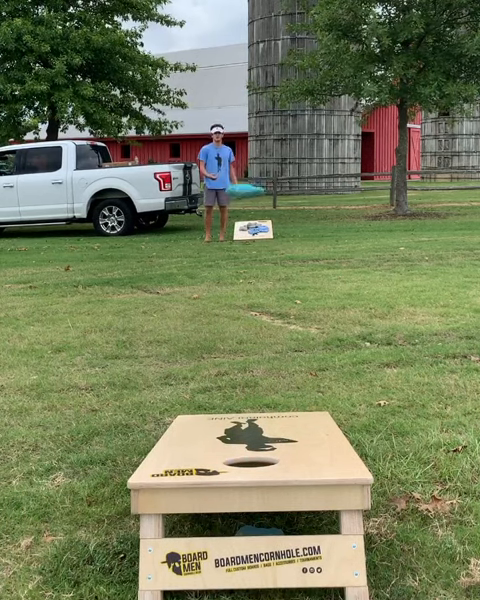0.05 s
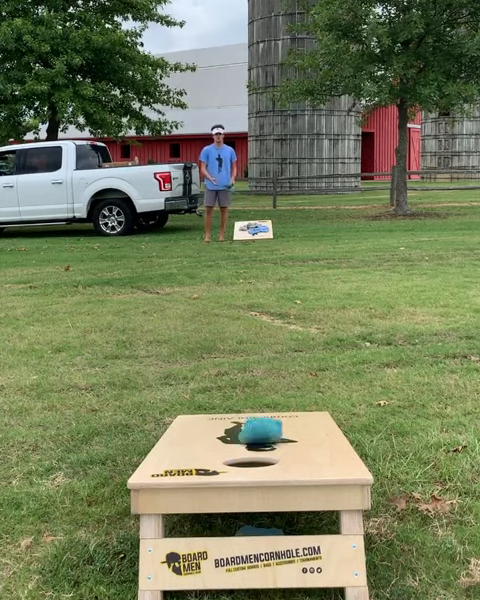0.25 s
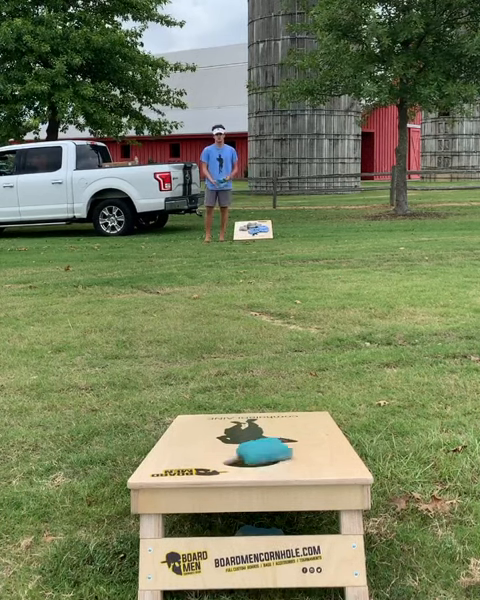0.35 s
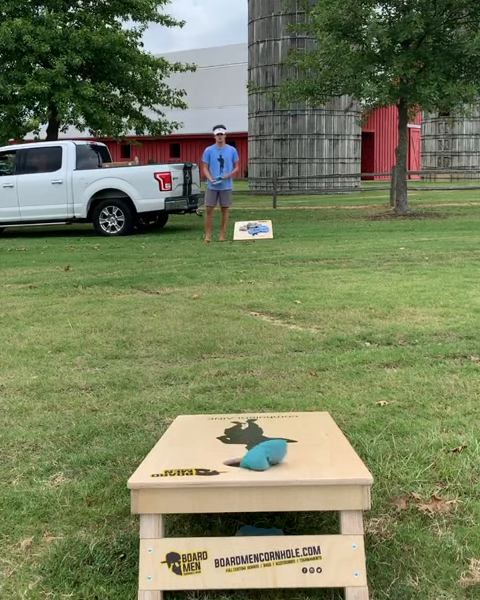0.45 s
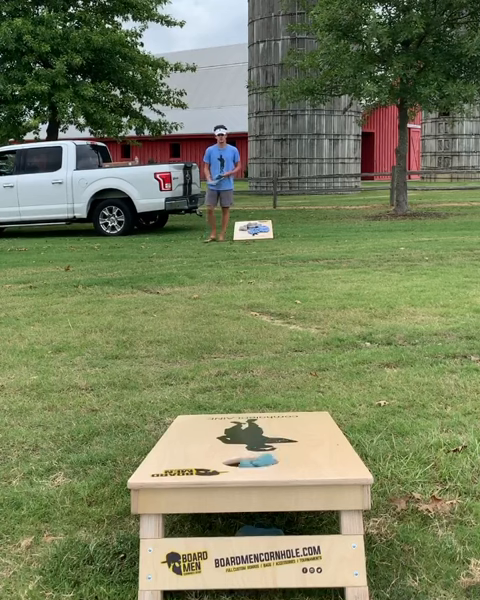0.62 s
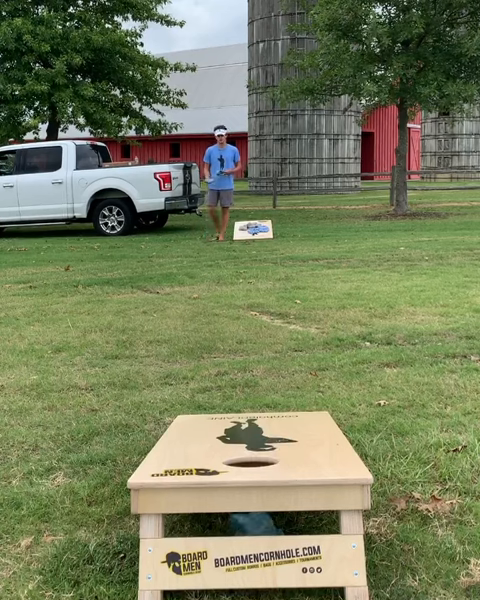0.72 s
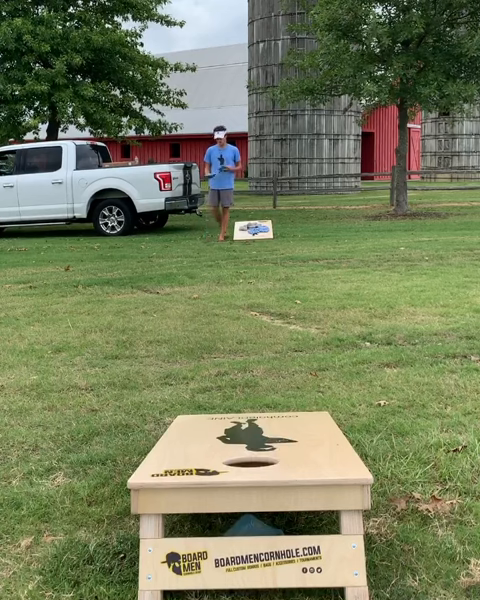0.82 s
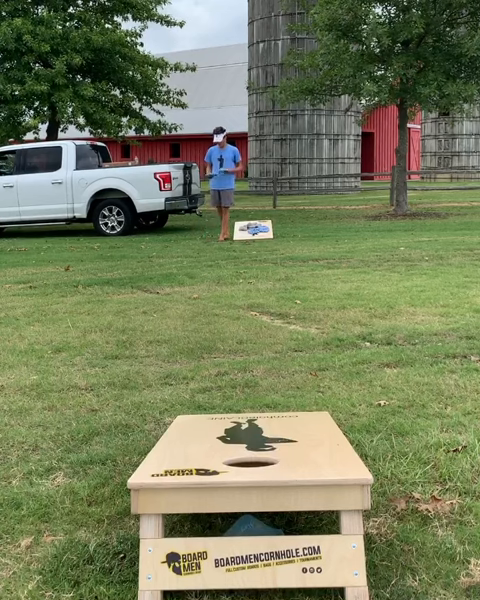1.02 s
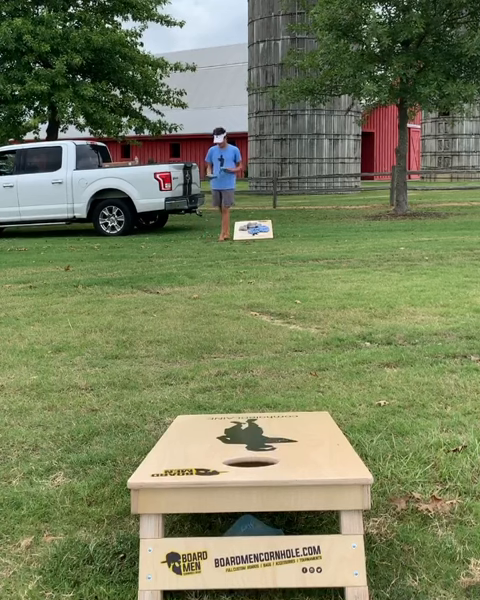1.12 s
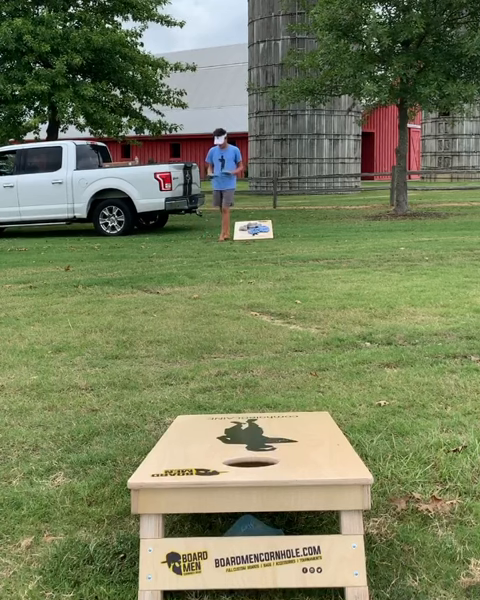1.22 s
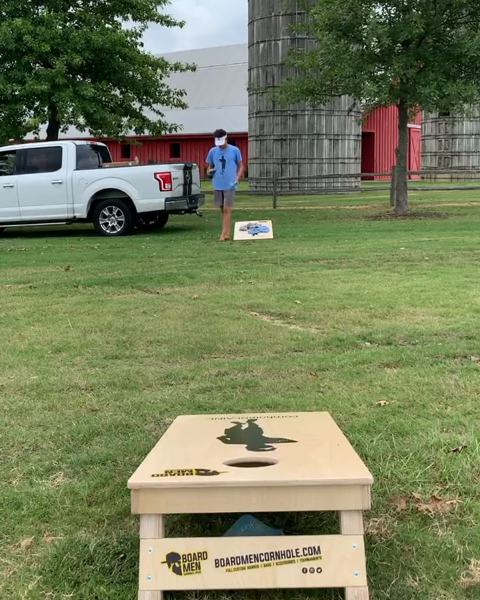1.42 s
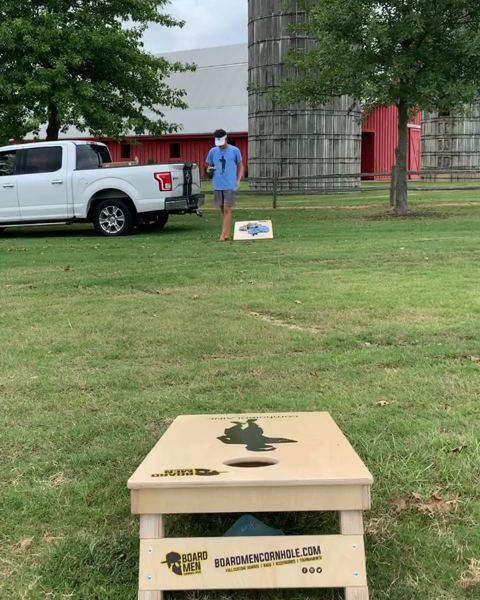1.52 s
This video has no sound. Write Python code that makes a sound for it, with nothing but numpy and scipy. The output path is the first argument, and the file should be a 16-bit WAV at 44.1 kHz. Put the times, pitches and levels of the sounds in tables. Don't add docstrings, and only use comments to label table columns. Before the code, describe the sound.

Sharp hollow thud of a beanbag on a plywood box, followed by faint cloth scuffs, outdoors

```python
import sys
import numpy as np
from scipy import signal
from scipy.fft import rfft, irfft, next_fast_len
from scipy.io import wavfile
from scipy.ndimage import uniform_filter1d, map_coordinates

SR = 44100
rng = np.random.default_rng(int(sys.argv[2]) if len(sys.argv) > 2 else 0)


def how_loud(loudness_db):
    steps = np.asarray(loudness_db, float) / 20
    return 10 ** steps


def int16_out(signal):
    q = np.round(np.clip(np.atleast_2d(signal).T, -1, 1) * 32767)
    wavfile.write(sys.argv[1], SR, q.astype(np.int16))


N = 68355

LAND_S, SHEET_DB = 0.2340, 30.5
RING_S, RING_DB, RING_RISE_S = 0.249, -22, 0.0056
HUM_HZ, HUM_SHAKE_HZ = 125.3, 4.82
TRAFFIC_DB, AIR_DB, YARD_DB = -58, -71, -30
TOP_HZ, OVER_TOP_DB = 15950, -22

# [delay/s, spread/(s*sqrt(Hz)), level/dB, polarity, left-right/dB]
WAVE_PATHS = [(.0019, .14, -.7, 1, .5), (.0022, .195, 1.1, -1, .5), (.00045, .255, -.3, 1, 0),
              (.00065, .335, -4.6, 1, 2), (.00385, .16, -7.6, 1, -1.5), (.0079, .245, -13, -1, 3)]
# [f/Hz, level/dB per Hz]
SHEET_SPECTRUM = [(60, -29), (110, -12), (348, 0.5), (497, 1), (939, -4), (1220, -10), (1770, -14),
                  (2600, -41.5), (3400, -75)]
# [f/Hz, left-right/dB]
SHEET_BALANCE = [(200, -1.5), (700, 3), (1300, 3), (2400, 10)]
# [f/Hz, level/dB, t60/s]
BOX_MODES = [(152.8, -6.5, 0.42), (199, -14, 0.069), (208.7, 2.5, 0.27), (297, 0, 0.2), (482, -2, .13),
             (518, -4.5, 0.17), (732, -14, 0.11), (877, -6, 0.14)]
# [t/s, rise/s, fall t60/s, hiss level/dB, thump level/dB]
CONTACTS = [(0.2397, 0.0004, 0.022, -18, -62), (0.244, 0.0036, 0.021, -30.5, -58),
            (.234, 0.0077, 0.027, -58, -26), (0.255, 0.0035, 0.08, -76, -25), (.3, 0.015, 1.5, -66.5, -77),
            (0.439, .005, 0.21, -48.5, -52.5), (0.4423, 0.0026, 0.026, -69, -43),
            (.465, 0.04, .12, -54.5, -49.5), (0.764, 0.011, 0.16, -52, -51),
            (0.794, 0.021, 0.081, -45, -42.5), (1.05, 0.022, 0.17, -67, -67)]
# [f/Hz, level/dB per Hz]
SLAP_SPECTRUM = [(1470, -35), (2500, -15.5), (4580, -4), (5520, -5.5), (8660, -8.5), (9360, -13),
                 (16000, -7.5)]
# [f/Hz, level/dB per Hz]
CLOTH_SPECTRUM = [(880, -39), (1500, -10.5), (2720, -12), (3840, -4.5), (4690, -8), (6060, -1.5),
                  (8830, -9.5), (16000, -4)]
# [f/Hz, level/dB per Hz]
THUMP_SPECTRUM = [(60, -120), (90, 7.5), (300, -6), (800, -7.5), (1600, -14.5), (2600, -23), (3000, -120)]
# [t/s, length/s, start f/Hz, end f/Hz, level/dB]
WHISTLES = [(0.074, 0.025, 5510, 5360, -65.5), (0.109, 0.031, 5630, 4900, -64),
            (0.142, 0.081, 4560, 3710, -65.5), (0.485, 0.073, 2440, 2255, -64),
            (0.609, 0.02, 3240, 2640, -63.5), (0.628, 0.029, 2360, 2440, -62.5),
            (0.796, 0.042, 3200, 3070, -68.5), (1.064, 0.032, 3300, 3030, -70.5),
            (1.12, 0.063, 2384, 2253, -60), (1.138, 0.027, 3460, 3210, -66),
            (1.188, 0.05, 2750, 2520, -64.5), (1.234, 0.13, 2670, 2547, -74),
            (1.362, 0.06, 2640, 2590, -73.5), (1.477, 0.024, 2830, 2830, -72.5),
            (0.986, 0.12, 1530, 1515, -63.5), (1.265, 0.11, 898, 983, -61.5),
            (1.299, 0.082, 1263, 1330, -65), (1.372, 0.047, 1656, 1594, -65.5)]
# [t/s, rumble level/dB, body level/dB]; the rumble peak at 0.262 s is the low thud of the hit
WIND_LEVELS = [(0.0, -37.5, -63.5), (0.112, -34.5, -62.5), (0.206, -44.5, -56), (0.262, -25, -77),
               (0.306, -46, -53), (0.626, -36, -51.5), (0.65, -46, -48), (0.776, -37, -52),
               (1.01, -44.5, -57.5), (1.056, -38, -55), (1.346, -46, -52), (1.55, -43.5, -55)]
# [f/Hz, level/dB per Hz]
RUMBLE_SPECTRUM = [(13, -46), (22, -17.5), (54, 0.5), (96, -7.5), (125, 0.5), (200, -31), (260, -57),
                   (440, -120)]
# [f/Hz, level/dB per Hz]
BODY_SPECTRUM = [(110, -36), (180, 0.5), (416, -11.5), (620, -18), (810, -55), (1360, -120)]
# [t/s, level/dB]
HUM_LEVELS = [(0.3, -57), (0.598, -49), (0.634, -34.5), (0.676, -47), (0.72, -35.5), (0.846, -53.5),
              (0.918, -30.5), (1.002, -46.5), (1.072, -61), (1.26, -69), (1.278, -43.5), (1.416, -59.5),
              (1.494, -38.5), (1.55, -50)]
# [f/Hz, level/dB per Hz]
TRAFFIC_SPECTRUM = [(450, -68), (620, -2.5), (900, 0), (1400, -9.5), (2040, -16.5), (3000, -35),
                    (3900, -35), (6000, -120)]
# [f/Hz, level/dB per Hz]
AIR_SPECTRUM = [(1470, -27), (2500, -0.5), (4050, -7), (4630, -15), (5380, -3), (8640, -13.5), (11100, -19),
                (16500, -29)]
# [f/Hz, likeness/1]
LIKENESS = [(60, 0.56), (180, 0.39), (550, 0.76), (1650, 0.75), (4970, 0.9), (15000, 0.13)]
# [f/Hz, left-right/dB]
BALANCE = [(60, -1.5), (240, 0), (950, 0), (3770, 0.5), (15000, -0.5)]
# [f/Hz, t60/s]
YARD_DECAY = [(200, 0.17), (1500, 0.27), (6000, 0.26), (15000, 0.77)]
# [f/Hz, width/Hz, level/dB]
DROPPED_BANDS = [(4770, 300, -12), (8720, 276, -14), (13100, 430, -19)]


def unit(x):
    return x / np.sqrt(np.mean(x ** 2) + 1e-20)


def along(points, hz):
    f, v = np.transpose(points)
    return np.interp(np.log(hz + 1), np.log(f + 1), v)


def curves(rows):
    s, *cols = np.transpose(rows)
    return [np.interp(np.arange(N) / SR, s, c) for c in cols]


def wobble(rate_hz):
    return map_coordinates(rng.standard_normal(200), [np.arange(N) * rate_hz / SR])


def filtered(x, response):
    m = next_fast_len(N + SR // 2)
    hz = np.fft.rfftfreq(m, 1 / SR)
    return irfft(rfft(x, m) * response(hz), m)[..., :N]


def sides(db):
    return how_loud(np.array([db / 2, -db / 2]))


def rush(spectrum, alike, lean=[(100, 0)]):
    def mid_side(hz):
        turn = np.arccos(np.clip(along(alike, hz), -1, 1)) / 2
        return how_loud(along(spectrum, hz)) * [np.cos(turn), np.sin(turn)]

    mid, side = filtered(rng.standard_normal((2, N)), mid_side)
    stereo = np.array([mid + side, mid - side])
    return unit(filtered(stereo, lambda hz: sides(along(lean, hz))))


def board():
    blow = np.zeros(N)
    blow[0] = how_loud(SHEET_DB)

    def sheet(hz):
        waves = 0
        for delay_s, spread, db, polarity, pan_db in WAVE_PATHS:
            lag_cycles = hz * (LAND_S + delay_s) + 2 * spread * np.sqrt(hz)
            gain = polarity * how_loud(db) * sides(pan_db)[:, None]
            waves = waves + gain * np.exp(-2j * np.pi * lag_cycles)
        return waves * how_loud(along(SHEET_SPECTRUM, hz)) * sides(along(SHEET_BALANCE, hz))

    sweep = filtered(blow, sheet)
    t = np.maximum(np.arange(N) / SR - RING_S, 0)
    ring = np.zeros((2, N))
    for (hz, db, t60_s), (a, b) in zip(BOX_MODES, rng.random((len(BOX_MODES), 2))):
        phase = a + 0.1 * b * np.array([[1], [-1]])
        ring += how_loud(db - 60 * t / t60_s) * np.sin(2 * np.pi * (hz * t + phase))
    rise = 1 - np.exp(-(t / RING_RISE_S) ** 2)
    return sweep + how_loud(RING_DB) * ring * rise


def bag():
    t = np.arange(N) / SR
    slap, slide, thump = np.zeros((3, N))
    for i, (s, rise_s, t60_s, hiss_db, thump_db) in enumerate(CONTACTS):
        swell = np.exp(-((t - s) / rise_s) ** 2)
        shape = np.where(t < s, swell, how_loud(-60 * np.abs(t - s) / t60_s))
        hiss = slap if i < 2 else slide
        hiss += how_loud(hiss_db) * shape
        thump += how_loud(thump_db) * shape
    grit = how_loud(1.8 * uniform_filter1d(rng.standard_normal(N), size=25) * 3.7)
    near = [(1000, 0.97), (8000, 0.93), (14000, 0.27)]  # f/Hz, likeness
    cloth = unit(grit * rush(CLOTH_SPECTRUM, near))
    return slap * rush(SLAP_SPECTRUM, near) + slide * cloth + thump * rush(THUMP_SPECTRUM, near)


def birds():
    out, t = np.zeros(N), np.arange(N) / SR
    shake, flutter = wobble(90), how_loud(1.2 * wobble(70.17))
    for s, length_s, from_hz, to_hz, db in WHISTLES:
        u = np.clip((t - s) / length_s, 0, 1)
        pitch_hz = (from_hz + (to_hz - from_hz) * u) * (1 + 0.0067 * shake)
        swell = np.sin(np.pi * u) ** 0.44 * (u < 1)
        out += how_loud(db + 6) * swell * np.sin(2 * np.pi * np.cumsum(pitch_hz) / SR)
    return out * flutter


def yard(x):
    hz, t, z = signal.stft(rng.standard_normal((2, SR // 2)), SR, nperseg=256)
    decay = how_loud(-60 * t / along(YARD_DECAY, hz)[:, None])
    tail = signal.istft(z * decay, SR, nperseg=256)[1]
    tail = tail / np.linalg.norm(tail[0])
    late = np.pad(x, (300, 0))[None]
    return signal.fftconvolve(late, tail, axes=1)[:, :N]


def wind():
    rumble_db, body_db = curves(WIND_LEVELS)
    rumble = how_loud(rumble_db + 1.2 * wobble(12.6)) * rush(RUMBLE_SPECTRUM, LIKENESS, BALANCE)
    body = how_loud(body_db + 4.5 * wobble(14.4)) * rush(BODY_SPECTRUM, LIKENESS, BALANCE)
    return rumble + body


def motor():
    level_db, = curves(HUM_LEVELS)
    pitch_hz = HUM_HZ + HUM_SHAKE_HZ * wobble(14.81)
    side_rad = np.array([[0.5], [-0.5]]) * 0.56
    hum = np.sin(2 * np.pi * np.cumsum(pitch_hz) / SR + side_rad)
    return how_loud(level_db - 4.5) * unit(hum)


def traffic():
    return how_loud(TRAFFIC_DB + 0.53 * wobble(5.4)) * rush(TRAFFIC_SPECTRUM, LIKENESS, BALANCE)


def leaves():
    return how_loud(AIR_DB + 0.23 * wobble(5.4)) * rush(AIR_SPECTRUM, LIKENESS, BALANCE)


def scene():
    near, song = board() + bag(), birds()
    near_echo = how_loud(YARD_DB) * yard(near.mean(0))
    song_stereo = song * sides(-0.37)[:, None]
    song_echo = how_loud(-4.5) * yard(song)
    return near + near_echo + song_stereo + song_echo + wind() + motor() + traffic() + leaves()


def top_cut(x):
    return signal.sosfilt(signal.butter(12, 17170, fs=SR, output="sos"), x)


def record(dry):
    def colour(hz):
        notch_db = sum(db * np.exp(-((hz - c) / w) ** 4) for c, w, db in DROPPED_BANDS)
        return how_loud(notch_db + OVER_TOP_DB * (hz > TOP_HZ))

    mix = filtered(dry, colour)
    return top_cut(mix)


dry = scene()
out = record(dry)
int16_out(out)
```